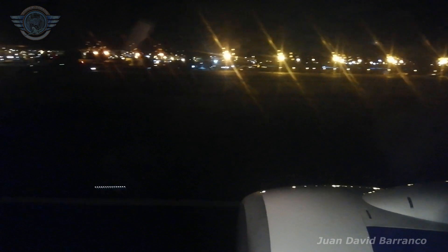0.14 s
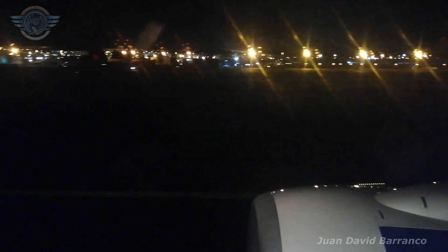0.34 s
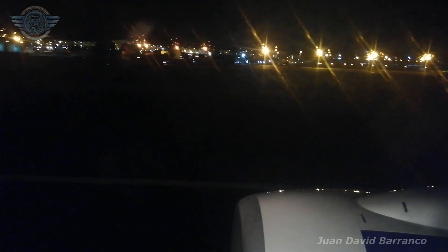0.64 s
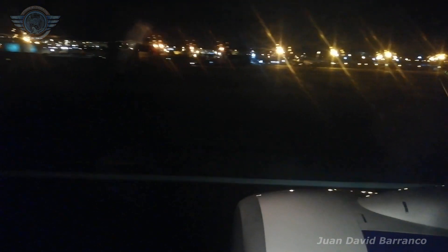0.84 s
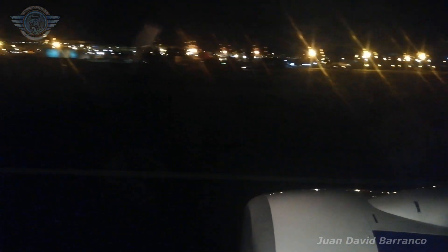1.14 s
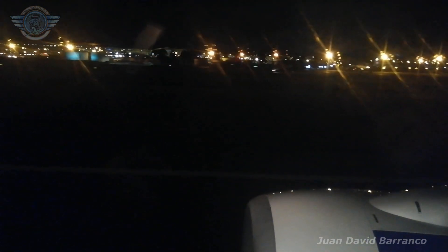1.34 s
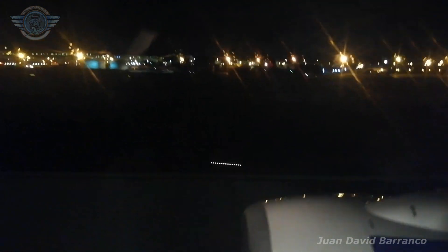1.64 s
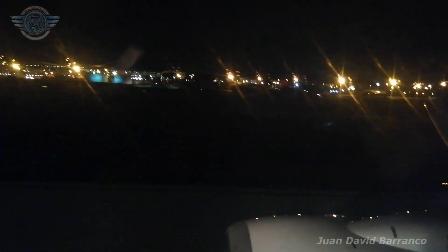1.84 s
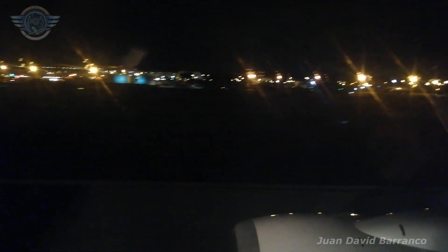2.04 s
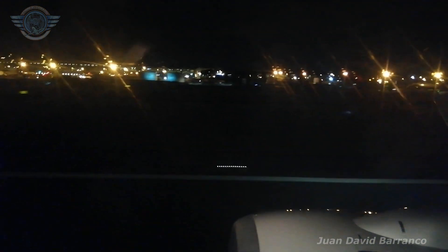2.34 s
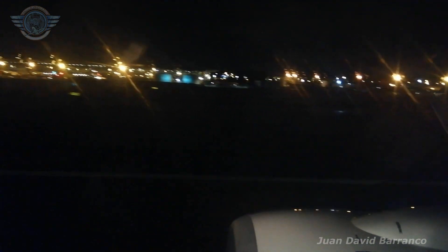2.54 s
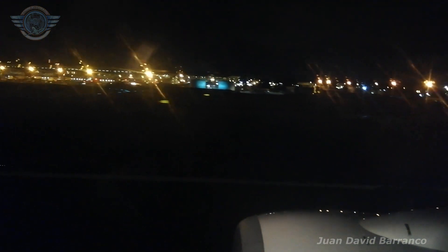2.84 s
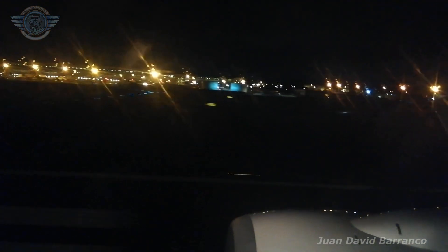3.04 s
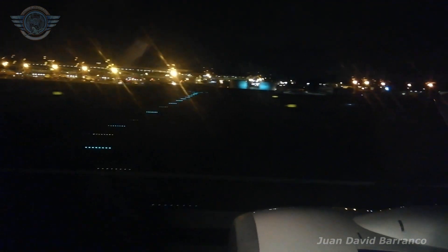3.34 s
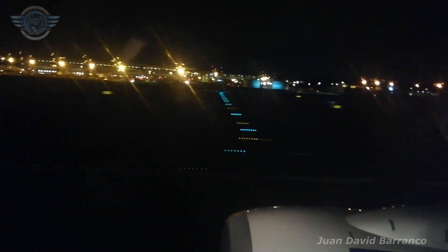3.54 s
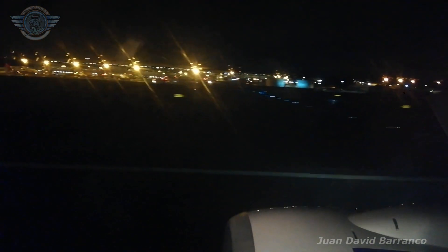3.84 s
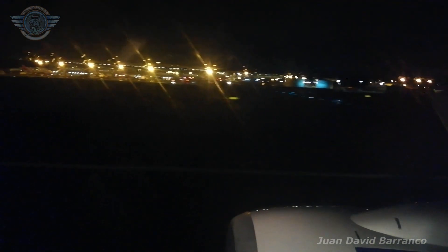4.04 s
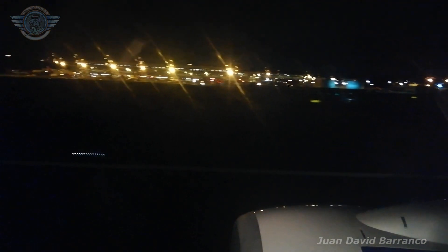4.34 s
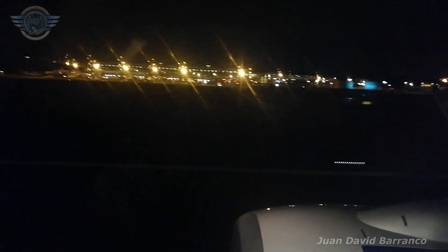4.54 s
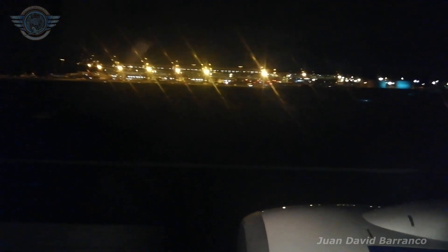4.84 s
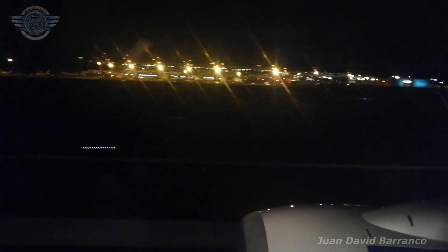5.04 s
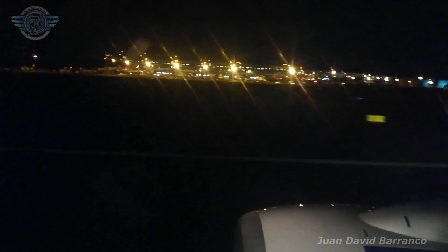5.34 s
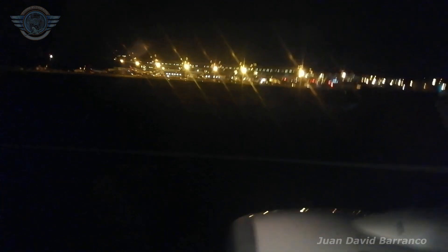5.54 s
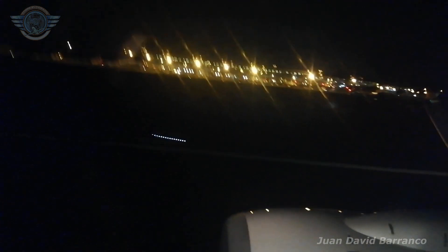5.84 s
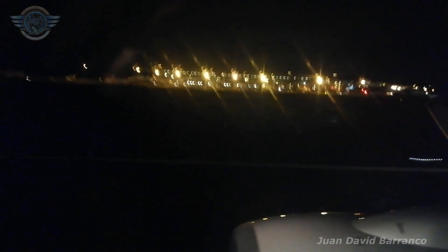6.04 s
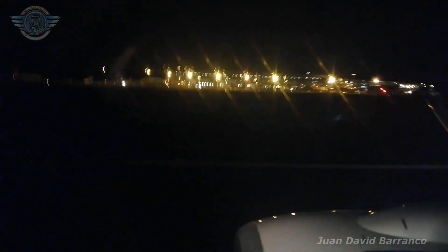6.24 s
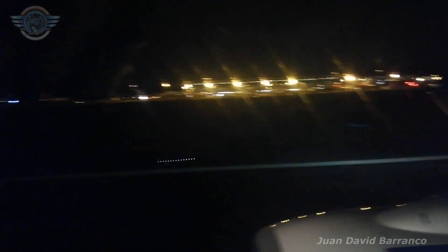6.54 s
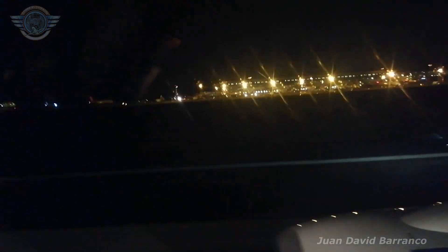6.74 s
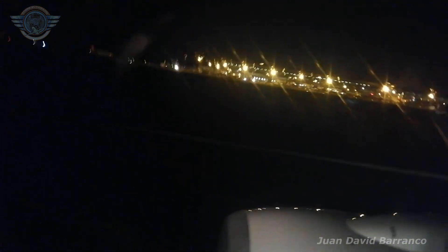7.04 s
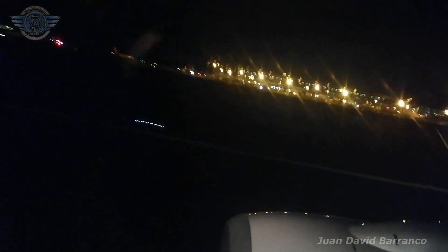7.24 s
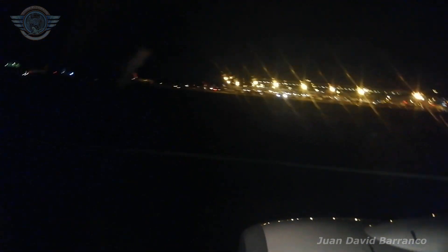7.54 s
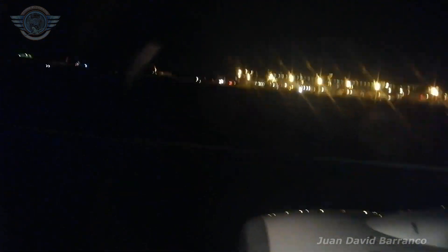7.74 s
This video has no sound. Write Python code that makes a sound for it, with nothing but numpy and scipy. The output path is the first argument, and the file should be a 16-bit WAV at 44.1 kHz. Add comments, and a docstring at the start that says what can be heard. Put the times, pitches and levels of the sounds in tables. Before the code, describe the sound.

Inside an airliner cabin, deep engine drone and rushing air wind downward, then wheels thump onto the runway with heavy rumble and rattling trim.

```python
"""Jet engine beside a window seat: fan and core hum and blade whine, sines that glide as the shafts wind down.
Shaped noise gives the cabin boom, roar, hiss and rumble; knocks, rattles and chatter are noise bursts.
At touchdown the fuselage thumps and small metal clinks, both as damped sines.
Gain control turns the whole cabin down under loud rumble; late on, the reversers open and roar and hiss grow."""
import sys
import numpy as np
from scipy import signal
from scipy.fft import rfft, irfft, next_fast_len
from scipy.io import wavfile
from scipy.ndimage import uniform_filter1d, minimum_filter1d, map_coordinates

SR = 44100
rng = np.random.default_rng(int(sys.argv[2]) if len(sys.argv) > 2 else 0)


def inscribe(sig):
    """Save sig as 16-bit PCM at rate SR to the path in sys.argv[1].

    A 1-D sig is mono; a 2-D sig holds one channel per row.
    Samples are clipped to [-1, 1] before scaling.
    """
    pcm = np.round(np.clip(np.atleast_2d(sig).T, -1, 1) * 32767)
    wavfile.write(sys.argv[1], SR, pcm.astype(np.int16))


N = 348831

# All levels are ahead of the gain control and limiter.
# Engine shafts. Each row: time in seconds, fan turns per second, core turns per second.
SHAFT_SPEEDS = [(0, 54.33, 213), (1.3, 54.36, 213), (1.8, 54.45, 213), (2.1, 53.6, 212), (2.5, 52, 209),
                (3.05, 49.5, 205), (3.55, 46.7, 202), (4, 43.6, 199), (5.5, 37, 193), (6.3, 34, 190.5),
                (7.91, 31, 190.5)]
# Gain of blade whine and blade hiss. Each row: time in seconds, gain in dB.
WHINE_GAIN = [(0, 1.5), (1.4, 1), (1.9, -2), (3.7, -1), (4.2, -3), (4.6, -16), (7.91, -25)]
# Narrow bands where the cabin wall passes the whine. Each row: centre in Hz, width in Hz, gain in dB.
WALL_LEAKS = [(1045, 50, -51), (5560, 160, -65), (5950, 90, -71), (6720, 70, -69), (7830, 90, -67),
              (8700, 100, -70), (9070, 110, -68), (10435, 60, -59)]
# Cabin resonance the core glides into. Each row: centre in Hz, width in Hz, gain in dB.
CORE_RING = [(191.45, 2.8, 12)]
# Hiss of the blade tips, response applied twice. Each row: centre in Hz, width in Hz, relative level in dB.
BLADE_HISS_BAND = [(10330, 2000, 0)]
# Spectrum of the cabin boom. Each row: frequency in Hz, relative level in dB.
BOOM_SPECTRUM = [(30, -100), (60, -55), (110, 1.5), (135, 0), (165, 3.5), (195, 1), (218, 0.5), (240, -22),
                 (300, -47), (600, -120)]
# Spectrum of airflow over the skin. Each row: frequency in Hz, relative level in dB.
ROAR_SPECTRUM = [(60, -82), (150, -15), (220, 0.5), (270, 0.5), (315, -2.5), (360, -8.5), (420, -15.5),
                 (500, -22), (600, -35), (900, -78), (2500, -120)]
# Spectrum of the air hiss. Each row: frequency in Hz, relative level in dB.
HISS_SPECTRUM = [(250, -34), (500, 3), (650, 5.5), (880, 3), (1180, 4.5), (1350, -1.5), (2500, -2.5),
                 (3400, -2.5), (5300, -6), (7400, -13), (10400, -8), (12200, -18.5), (15700, -32)]
# Vents and trim gaps colouring the hiss. Each row: centre in Hz, width in Hz, dB over the hiss.
VENTS = [(1056, 132, 4), (1497, 36, 8), (1920, 120, 8), (2014, 56, 9), (2354, 140, 4.5), (2978, 36, 7),
         (3720, 83, 4)]
# Spectrum of rumble in the air. Each row: frequency in Hz, relative level in dB.
BUFFET_SPECTRUM = [(8, -37), (20, -12), (32, -25), (44, -0.5), (53, 6.5), (62, 5), (73, 5), (85, -0.5),
                   (106, 1), (125, -5.5), (150, -6), (200, -22), (330, -120)]
# Spectrum of rumble on the runway. Each row: frequency in Hz, relative level in dB.
RUNWAY_SPECTRUM = [(6, -6), (20, -35), (31, 1), (42, -13), (52, 4.5), (72, -3), (88, -7), (115, -5.5),
                   (150, -21), (200, -79), (330, -120)]
# Buffeting in the air. Each row: time in seconds, level in dB.
BUFFET_LEVEL = [(0, -16), (.25, -11.5), (.5, -20.5), (.8, -16), (.97, -21), (1.12, -15), (1.8, -15.5),
                (2.08, -25.5), (2.36, -15.5), (2.52, -21), (2.68, -17.5), (3.35, -19), (3.8, -24),
                (4.55, -20), (5.35, -24.5), (5.6, -20.5)]
# Rumble under the tyres. Each row: time in seconds, level in dB.
RUNWAY_LEVEL = [(5.6, -11.5), (5.85, -10), (6.1, -4.5), (6.62, -9.5), (6.83, -18), (6.95, -13.5),
                (7.28, -6), (7.42, -10), (7.91, -10.5)]
# Fits of loose trim. Each row: time of the height in seconds, level in dB, half length in seconds.
CHATTERS = [(5.76, -45, 0.032), (6.043, -36.5, 0.15), (6.264, -40.5, 0.086), (6.837, -44, 0.074),
            (7.402, -36, 0.053), (7.583, -42, 0.049), (7.787, -34.5, 0.021)]
# Spectrum of loose trim. Each row: frequency in Hz, relative level in dB.
TRIM_SPECTRUM = [(150, -29.5), (330, 15), (500, 10.5), (800, 11.5), (1300, 6), (2000, -4), (3400, 2.5),
                 (5500, -3), (10000, -7), (12500, -13), (15700, -28)]
# Dull wall panel knocks. Each row: start in seconds, level in dB, length in seconds.
KNOCKS = [(1.49, -39, 0.031), (5.03, -37.5, .033), (5.7, -37, 0.048), (5.995, -33.5, .03),
          (6.095, -37, 0.055), (6.21, -33.5, 0.042), (6.81, -40.5, .08), (7.33, -34.5, 0.023),
          (7.368, -33.5, 0.028), (7.41, -38, .026), (7.765, -34, 0.023)]
# Panel resonances. Each row: centre in Hz, width in Hz, relative level in dB.
PANEL_MODES = [(810, 850, -4.5), (1160, 49, 4.5), (1530, 71, 0.5), (2540, 1700, -14)]
# Loudest rattles of bins and trays. Each row: start in seconds, level in dB, length in seconds.
RATTLES = [(5.685, -45, 0.029), (5.911, -30.5, 0.0057), (6.011, -33, 0.012), (6.214, -44, .05),
           (6.303, -33, 0.0094), (6.343, -41, .012), (7.327, -34, 0.018), (7.368, -31.5, .019),
           (7.409, -35, 0.019), (7.494, -42, .013), (7.536, -38.5, 0.015), (7.578, -41.5, .02),
           (7.749, -37, .016)]
# Spectrum of hard plastic. Each row: frequency in Hz, relative level in dB.
PLASTIC_SPECTRUM = [(200, -45), (800, -15), (2000, -17), (4000, 1.5), (5700, 1), (8200, -3), (10500, 1),
                    (12500, -22), (15700, -24)]
# Jolts through the landing gear. Each row: start in seconds, level in dB, pitch in Hz, t60 in seconds.
THUMPS = [(5.62, -6, 30.5, .34), (5.707, 2, 71.1, 0.87), (5.83, 4, 72, 0.4), (5.862, 3.5, 115.5, 0.3),
          (6.07, 9, 64.3, 0.32), (6.254, 13, 52.4, 0.27), (6.361, -2, 45.2, 0.8), (6.921, 2.5, 46, 0.36),
          (7.182, -2, 56.7, 0.11), (7.521, 4, 46, 0.44), (7.651, 0.5, 38.1, 0.68)]
# Small metal fittings. Each row: start in seconds, level in dB, pitch in Hz, t60 in seconds.
CLINKS = [(5.912, -38, 4215, .14), (6.212, -29, 1534, .13), (6.842, -31.5, 3140, 0.096),
          (7.292, -28.5, 4130, .04), (7.77, -32, 3580, 0.17), (7.785, -35, 4600, .12)]
# Stereo width of the cabin noise. Each row: frequency in Hz, side minus mid in dB.
STEREO_WIDTH = [(30, -25), (60, -22.5), (125, -17.5), (220, -13), (330, -12.5), (480, 4), (700, 2.5),
                (1100, -1.5), (3000, -0.5)]
# Microphone ports. Each row: frequency in Hz, left minus right in dB.
PORT_TILT = [(200, 0.5), (320, -1.5), (460, -3), (640, 2.5), (1000, -1.5), (1500, -4), (3400, -6),
             (5400, -6.5), (7200, -1.5), (8700, 9), (10400, 14.5), (12500, 7)]

BLADES = 24
FAN_DB, FAN_DB_PER_HZ = -26, 0.7  # fan hum at approach speed; its fall as the fan slows
CORE_DB = -29.5  # away from the resonance
BLADE_HISS_DB = -60.5  # before WHINE_GAIN
WHINE_RIGHT_DB = -7  # right port relative to left
TOUCHDOWN_S, SETTLE_S = 5.6, 0.037  # wheels meet the runway; time constant of taking the weight
FLARE_S, FLARE_RISE_S = 1.9, 0.15  # the nose lifts before touchdown
REVERSE_S, REVERSE_RISE_S, REVERSE_ROAR_DB, REVERSE_HISS_DB = 7.46, 0.12, 3.2, 2.2  # reversers open; added gains
BOOM_DB, BOOM_FADE_DB_PER_S, BOOM_ROLL_DB = -19, 0.67, -16  # at first, fall in the air, on the runway
ROAR_DB = -28
HISS_DB, HISS_FLARE_DB = -43.5, 0.68  # on approach; rise in the flare
TICKS_PER_S, TICK_DB, TICK_SPREAD_DB, TICK_S = 12, -50, 9, 0.007  # stray rattles; spread is plus or minus
RATTLE_RISE_S = 0.001  # hard plastic bites at once
GAIN_KNEE_DB, GAIN_SLOPE, RECOVER_DB_PER_S = -13, 0.51, 8.5  # threshold, dB cut per dB above it, release
CEILING = 0.92
TOP_HZ = 15780


def amp(db):
    """Amplitude ratio of a dB value."""
    return 10 ** (np.asarray(db) / 20)


def unit(x):
    """Scale to an rms of 1."""
    return x / np.sqrt(np.mean(x ** 2) + 1e-20)


def along(points, hz):
    """Interpolate (Hz, value) points on a log frequency axis."""
    f, v = np.transpose(points)
    return np.interp(np.log(hz + 1), np.log(f + 1), v)


def curves(rows):
    """One value per sample for each column after the time."""
    s, *cols = np.transpose(rows)
    return [np.interp(np.arange(N) / SR, s, c) for c in cols]


def since(s):
    """Seconds since a moment, zero before it."""
    return np.maximum(np.arange(N) / SR - s, 0)


def step(s, rise_s):
    """Zero until a moment, then easing up to one."""
    return 1 - np.exp(-since(s) / rise_s)


def wobble(knots_per_s):
    """Smooth random curve through random knots."""
    knots = rng.standard_normal(int(N * knots_per_s / SR) + 4)
    return map_coordinates(knots, [np.arange(N) * knots_per_s / SR])


def filtered(x, response):
    """Multiply the spectrum of x by a response of frequency."""
    m = next_fast_len(N + SR // 2)
    return irfft(rfft(x, m) * response(np.fft.rfftfreq(m, 1 / SR)), m)[..., :N]


def colour(points):
    """Gain function of a (Hz, dB) spectrum."""
    return lambda hz: amp(along(points, hz))


def peaks(modes):
    """Gain function of (Hz, width Hz, dB) resonances, summed in power."""
    def gain(hz):
        power = 0
        for centre, width, db in modes:
            damping = (hz * width) ** 2
            power = power + amp(db) ** 2 * damping / ((centre * centre - hz * hz) ** 2 + damping)
        return np.sqrt(power)
    return gain


def diffuse(gain, patchy_db):
    """Stereo noise, mid rms 1, with patches of random gain; long waves reach both ports alike."""
    z = signal.stft(rng.standard_normal((2, N)), nperseg=512)[2]
    field = rng.standard_normal(z.shape[1:])
    field = uniform_filter1d(uniform_filter1d(field, 6, 0), 12, 1)
    pair = signal.istft(z * amp(patchy_db * unit(field)), nperseg=512)[1][:, :N]
    mid, side = filtered(pair, lambda hz: np.array([gain(hz), gain(hz) * colour(STEREO_WIDTH)(hz)]))
    return np.array([mid + side, mid - side]) / np.std(mid)


def even(x, size=SR // 8):
    """Hold low noise near a steady rms of 1."""
    power = uniform_filter1d(uniform_filter1d(np.mean(x ** 2, 0), size), size)
    return x / np.sqrt(np.abs(power) + 1e-9)


def bursts(rows, rise_s):
    """Envelope of bursts, each swelling quickly and fading as a Gaussian over its length."""
    out = np.zeros(N)
    for s, db, length_s in rows:
        out += amp(db) * step(s, rise_s) * np.exp(-(since(s) / length_s) ** 2)
    return out


def ring_decay(t, t60_s):
    """Exponential decay by 60 dB in t60."""
    return np.exp(-np.log(1000) * t / t60_s)


def contacts(knots_per_s, spread_db):
    """Random fast gain of rms 1 for parts touching."""
    return unit(amp(spread_db * wobble(knots_per_s)))


def engine():
    """Both shafts hum through the wing; blade rate harmonics swell as they glide across the wall's leaks."""
    fan_hz, core_hz = curves(SHAFT_SPEEDS)
    fan_phase = 2 * np.pi * np.cumsum(fan_hz * (1 + 0.0002 * wobble(14))) / SR  # heavy fan barely wavers
    core_phase = 2 * np.pi * np.cumsum(core_hz * (1 + 0.007 * wobble(16))) / SR
    fan_db = FAN_DB + FAN_DB_PER_HZ * (fan_hz - fan_hz[0])
    fan = amp(fan_db + 2.5 * wobble(7)) * np.sin(fan_phase)
    core_ring = np.hypot(1, peaks(CORE_RING)(core_hz))
    core = amp(CORE_DB + 1.5 * wobble(10)) * core_ring * np.sin(core_phase)
    hum = np.sqrt(2) * (fan + core)  # sqrt(2): sine levels are rms
    return hum + amp(curves(WHINE_GAIN)[0]) * blades(fan_hz, fan_phase)


def blades(fan_hz, fan_phase):
    """Ten harmonics of the blade rate, filtered by the wall, plus broad hiss of the blade tips."""
    port_phase = np.array([[0], [np.pi / 2]])  # short waves reach the ports out of step
    whine = np.zeros((2, N))
    for k in BLADES * np.arange(1, 11):
        flutter = amp(1.5 * wobble(20))
        whine += peaks(WALL_LEAKS)(k * fan_hz) * flutter * np.sin(k * fan_phase + port_phase)
    hiss = diffuse(lambda hz: peaks(BLADE_HISS_BAND)(hz) ** 2, patchy_db=1)
    return np.sqrt(2) * whine * amp([[0], [WHINE_RIGHT_DB]]) + amp(BLADE_HISS_DB) * hiss


def airflow():
    """Air over skin and flaps: boom easing until touchdown; roar and vent hiss grow with reverse thrust."""
    on_ground = step(TOUCHDOWN_S, SETTLE_S)
    reverse = step(REVERSE_S, REVERSE_RISE_S)
    flare = step(FLARE_S, FLARE_RISE_S)
    boom_air_db = BOOM_DB - BOOM_FADE_DB_PER_S * since(0)
    boom_db = (1 - on_ground) * boom_air_db + on_ground * BOOM_ROLL_DB
    boom = amp(boom_db + 0.76 * wobble(7)) * even(diffuse(colour(BOOM_SPECTRUM), patchy_db=2.5))
    roar_db = ROAR_DB + REVERSE_ROAR_DB * reverse
    roar = amp(roar_db + 0.7 * wobble(3.97)) * diffuse(colour(ROAR_SPECTRUM), patchy_db=1.33)
    vented = lambda hz: colour(HISS_SPECTRUM)(hz) * np.hypot(1, peaks(VENTS)(hz))
    hiss_db = HISS_DB + HISS_FLARE_DB * flare + REVERSE_HISS_DB * reverse
    hiss = amp(hiss_db + 0.5 * wobble(9)) * diffuse(vented, patchy_db=0.95)
    return boom + roar + hiss


def rumble():
    """The airframe shakes with buffeting, then with the runway under the tyres."""
    on_ground = step(TOUCHDOWN_S, SETTLE_S)
    buffet_db = curves(BUFFET_LEVEL)[0] + 0.73 * wobble(12)
    buffet = amp(buffet_db) * even(diffuse(colour(BUFFET_SPECTRUM), patchy_db=3.0))
    runway_db = curves(RUNWAY_LEVEL)[0] + 0.89 * wobble(15)
    runway = amp(runway_db) * even(diffuse(colour(RUNWAY_SPECTRUM), patchy_db=2.5))
    return (1 - on_ground) * buffet + on_ground * runway


def trim_chatter():
    """Loose trim chatters in fits that swell and fade symmetrically."""
    fits = np.zeros(N)
    for s, db, half_s in CHATTERS:
        fits += amp(db) / (1 + ((since(0) - s) / half_s) ** 2)
    return fits * contacts(300, spread_db=2.5) * diffuse(colour(TRIM_SPECTRUM), patchy_db=0.5)


def panel_knocks():
    """Shaken wall panels knock dully: noise bursts through the panel resonances."""
    padded = lambda hz: peaks(PANEL_MODES)(hz) / (1 + (hz / 5000) ** 4)  # soft backing swallows treble
    return bursts(KNOCKS, rise_s=0.0034) * contacts(500, spread_db=2.5) * diffuse(padded, patchy_db=1.5)


def stray_ticks():
    """Small rattles at random moments of the roll, as (s, dB, length s) rows."""
    roll_s = N / SR - TOUCHDOWN_S
    draws = rng.random((round(TICKS_PER_S * roll_s), 2))
    rows = []
    for when, size in draws:
        rows.append((TOUCHDOWN_S + when * roll_s, TICK_DB + TICK_SPREAD_DB * (2 * size - 1), TICK_S))
    return rows


def plastic_rattles():
    """Bins and trays rattle: short bursts of bright noise."""
    plastic = contacts(900, spread_db=0.5) * diffuse(colour(PLASTIC_SPECTRUM), patchy_db=3.5)
    return (bursts(RATTLES, RATTLE_RISE_S) + bursts(stray_ticks(), RATTLE_RISE_S)) * plastic


def gear_thumps(rise_s=0.028):
    """Each jolt, softened by the struts, sets the fuselage swinging as a damped sine."""
    out = np.zeros(N)
    for s, db, hz, t60_s in THUMPS:
        t = since(s)
        out += amp(db) * ring_decay(t, t60_s) * step(s, rise_s) * np.sin(2 * np.pi * hz * t)
    return out


def metal_clinks():
    """Small metal fittings ring as damped sines, their phase jittered by a loose buzz."""
    out = np.zeros((2, N))
    for s, db, hz, t60_s in CLINKS:
        t = since(s)
        buzz = np.array([wobble(900), wobble(900)])
        out += amp(db) * ring_decay(t, t60_s) * step(s, 0.00044) * np.sin(2 * np.pi * hz * t + buzz)
    return out


def scene():
    """Everything heard at the seat."""
    cabin = engine() + airflow() + rumble()
    shaken = trim_chatter() + panel_knocks() + plastic_rattles() + metal_clinks()
    return cabin + shaken + gear_thumps()


def gain_control(x, size=SR // 16):
    """Loud sound, chiefly rumble, turns everything down quickly; the gain then creeps back."""
    level_db = 10 * np.log10(np.abs(uniform_filter1d(np.mean(x ** 2, 0), size)) + 1e-9)
    cut_db = GAIN_SLOPE * np.maximum(level_db - GAIN_KNEE_DB, 0)
    recovery_db = RECOVER_DB_PER_S * since(0)
    held_db = np.maximum.accumulate(cut_db + recovery_db) - recovery_db  # peak hold with linear release
    return x * amp(-uniform_filter1d(held_db, size))


def ports(hz):
    """Left and right port gains, tilted apart at constant total power."""
    tilt = colour(PORT_TILT)(hz)
    return np.array([tilt, np.ones_like(tilt)]) * np.sqrt(2 / (1 + tilt ** 2))


def record(dry):
    """Port colour, gain control, a smoothed peak limiter, then a cut above TOP_HZ."""
    x = gain_control(filtered(dry, ports))
    needed = np.minimum(1, CEILING / (np.abs(x).max(0) + 1e-9))
    gain = uniform_filter1d(minimum_filter1d(needed, size=2400), size=2000)
    return filtered(x * gain, lambda hz: hz < TOP_HZ)


dry = scene()
out = record(dry)
inscribe(out)
```